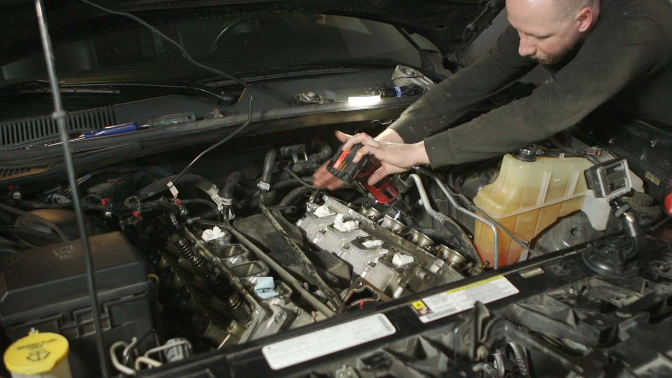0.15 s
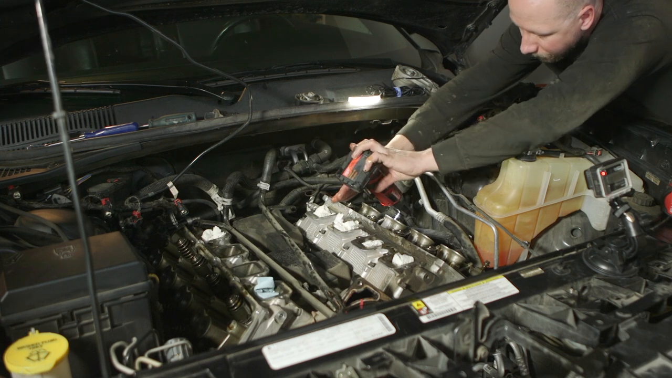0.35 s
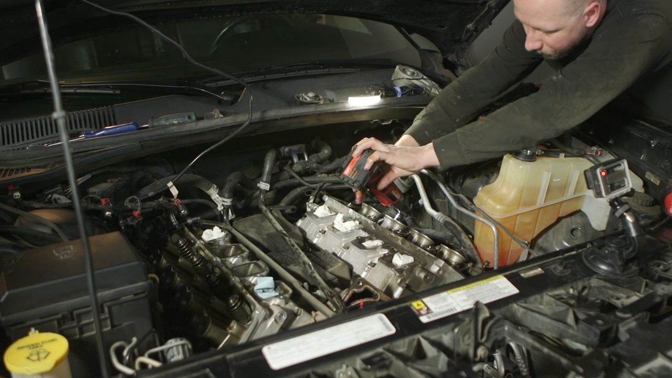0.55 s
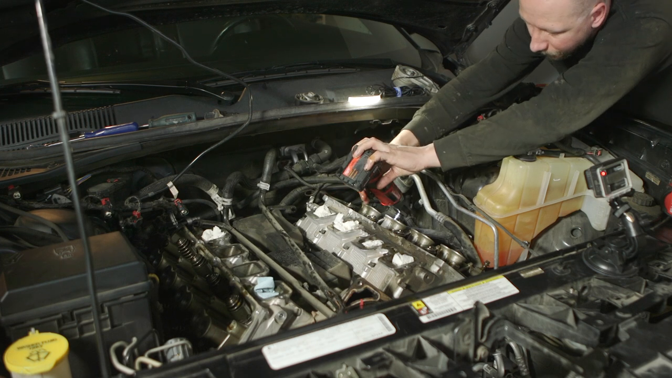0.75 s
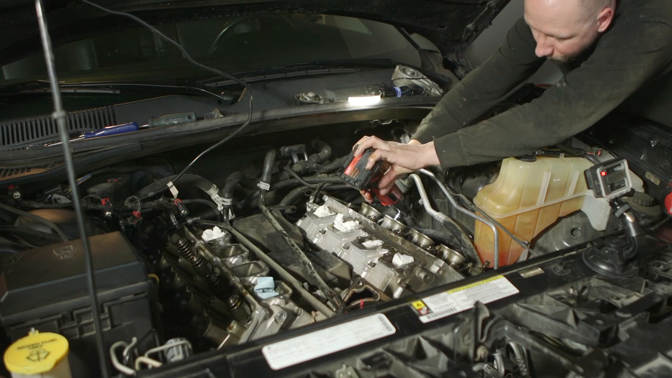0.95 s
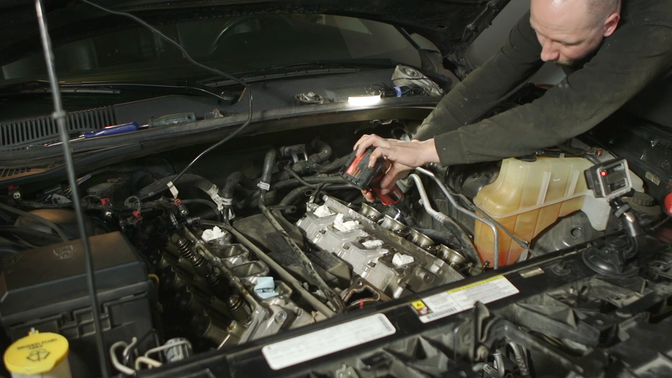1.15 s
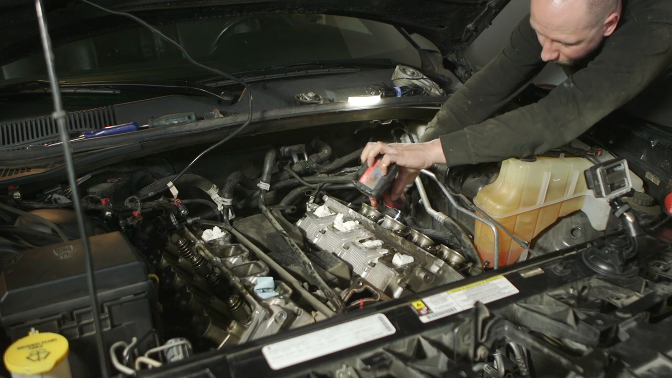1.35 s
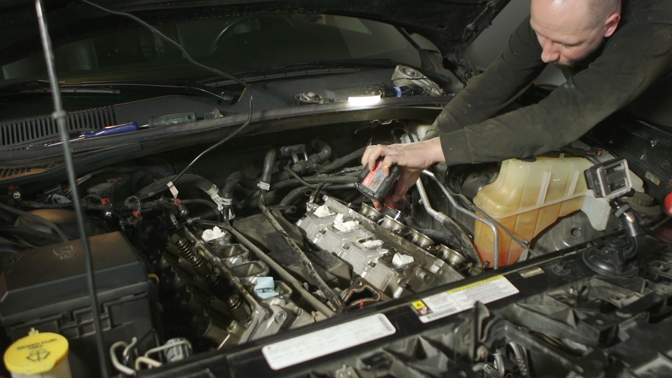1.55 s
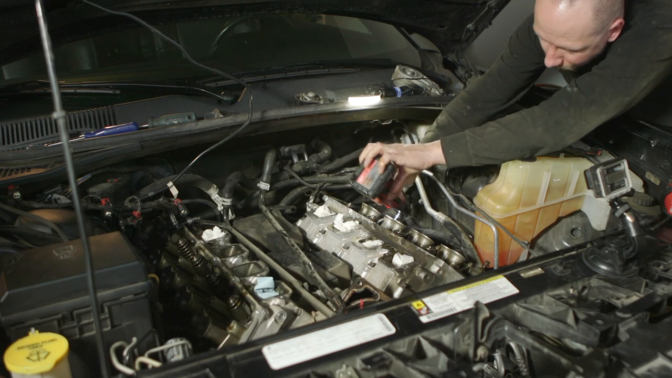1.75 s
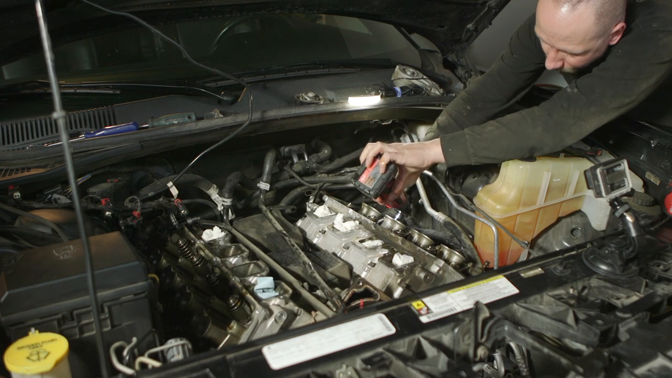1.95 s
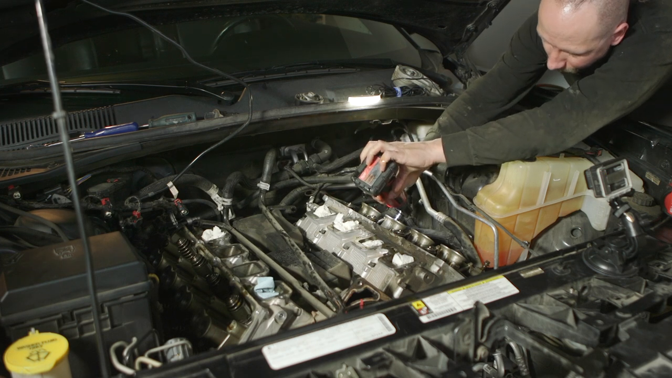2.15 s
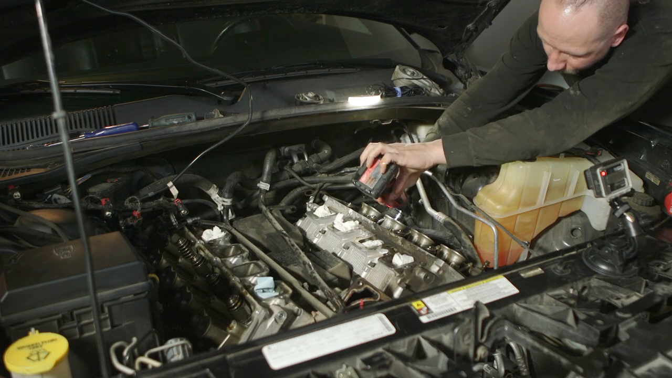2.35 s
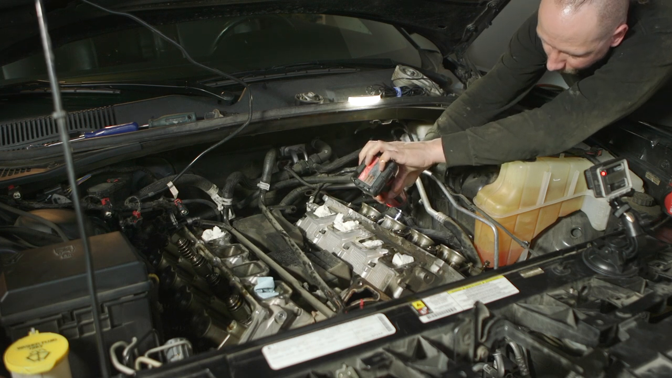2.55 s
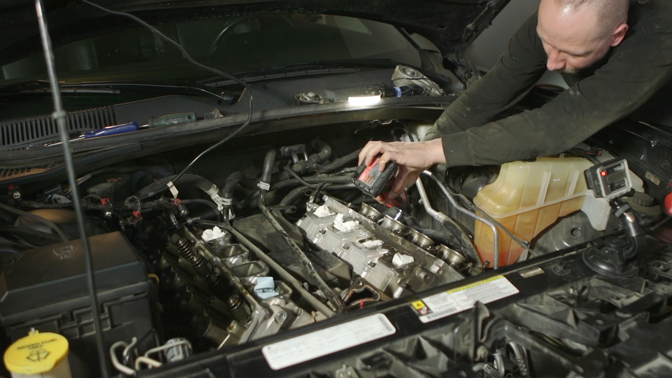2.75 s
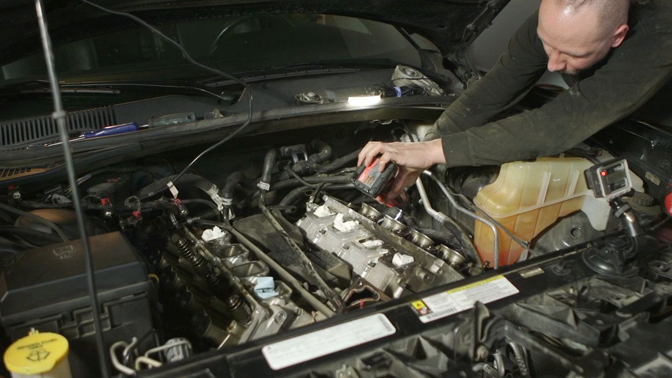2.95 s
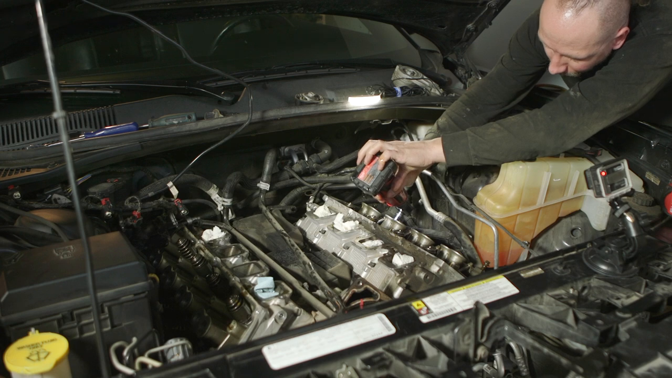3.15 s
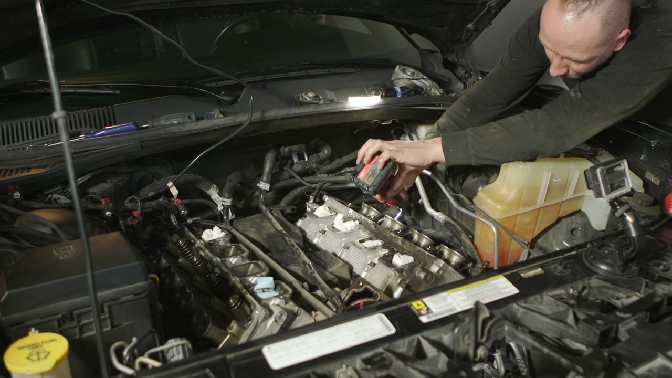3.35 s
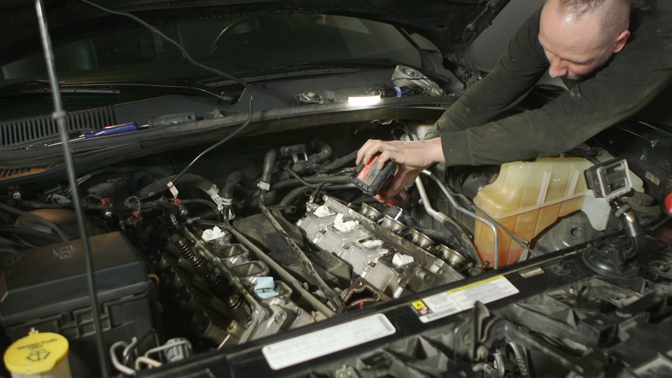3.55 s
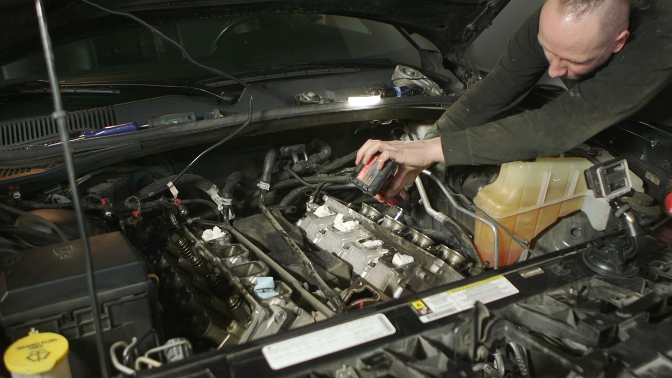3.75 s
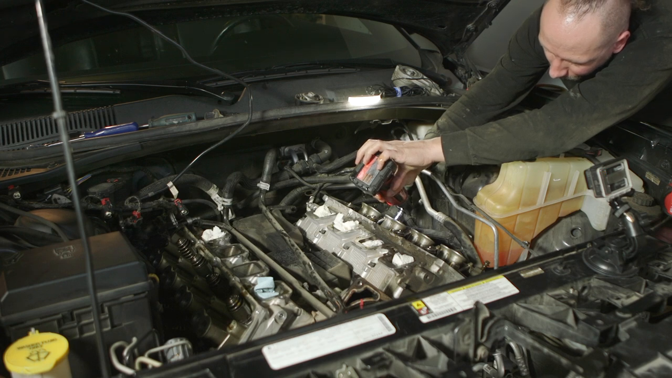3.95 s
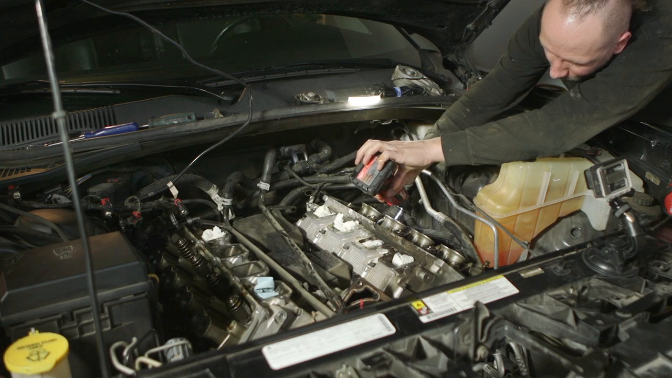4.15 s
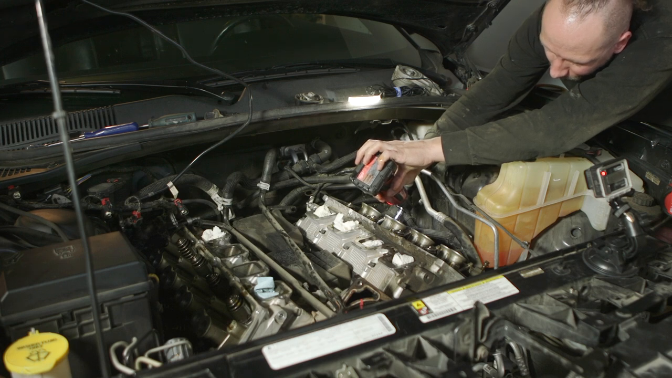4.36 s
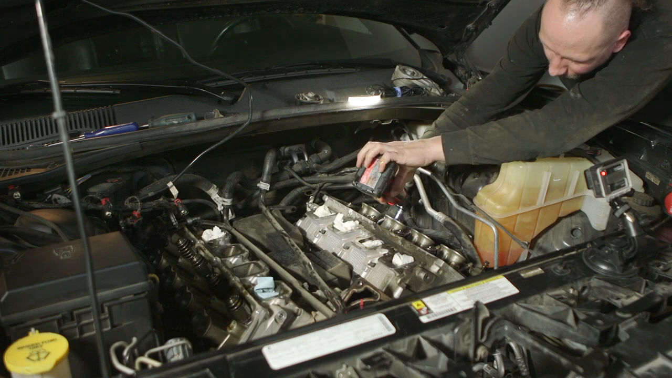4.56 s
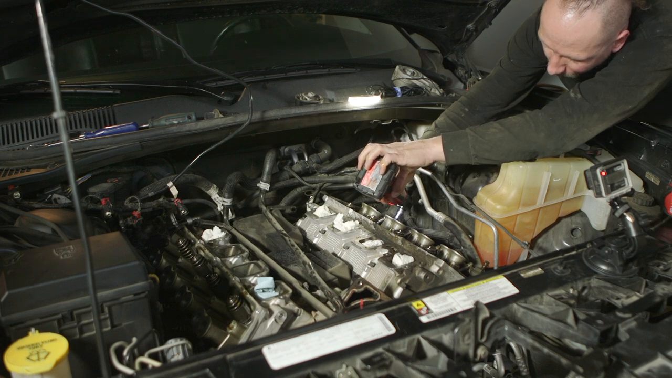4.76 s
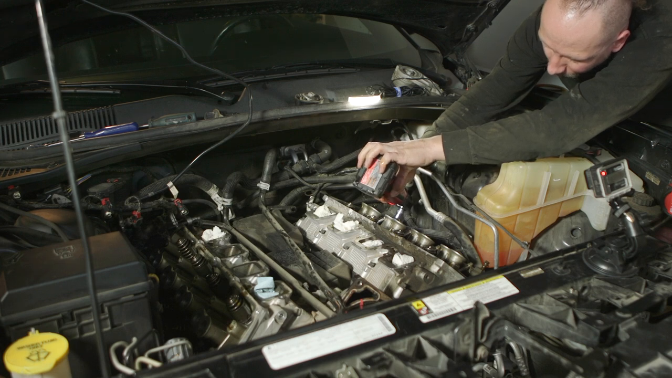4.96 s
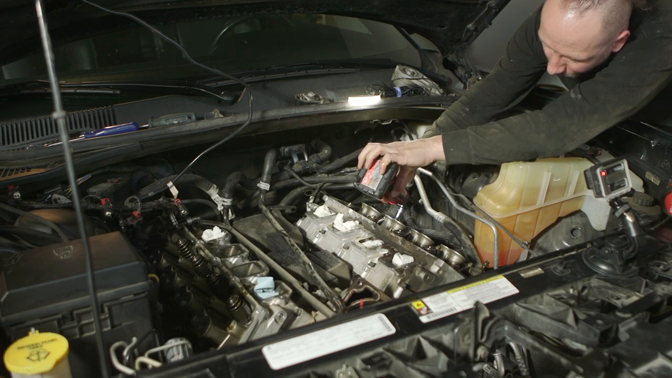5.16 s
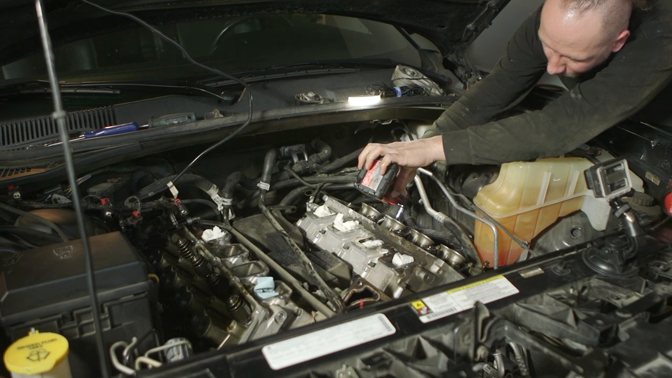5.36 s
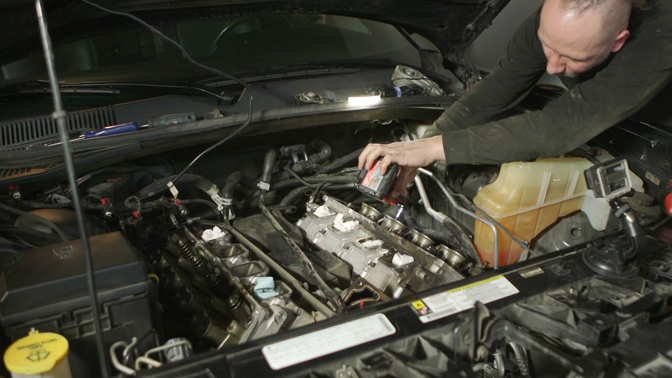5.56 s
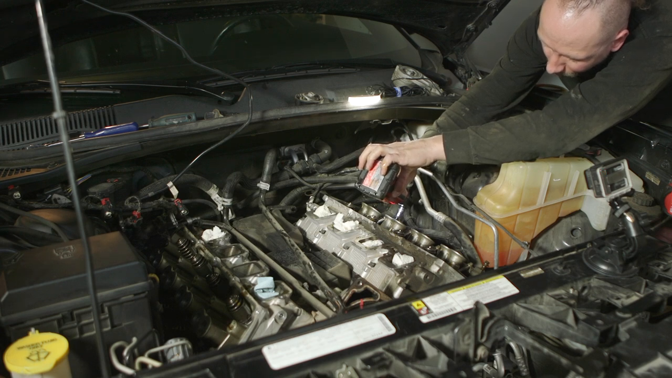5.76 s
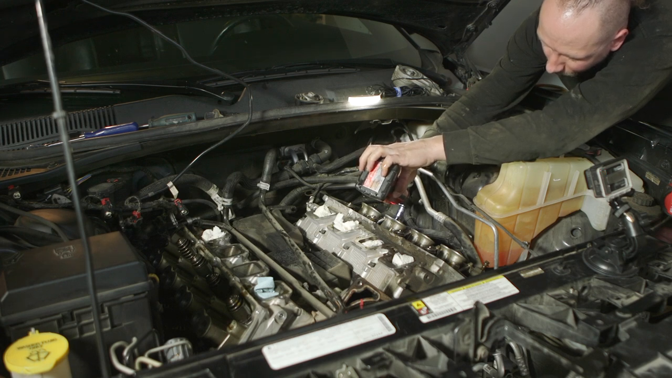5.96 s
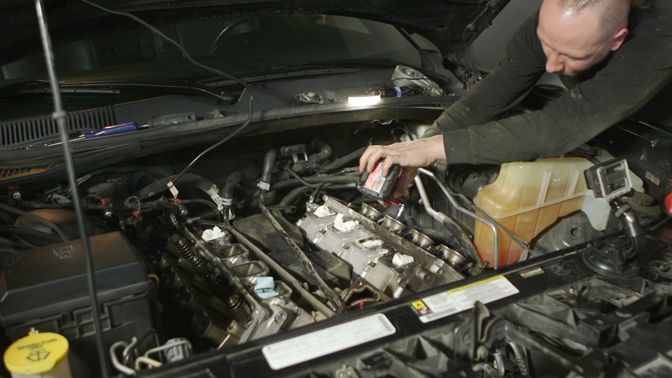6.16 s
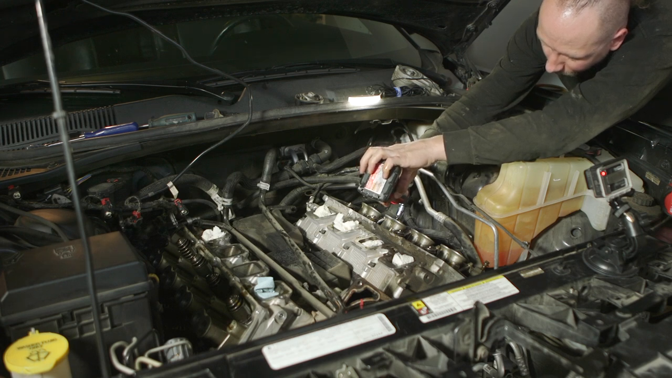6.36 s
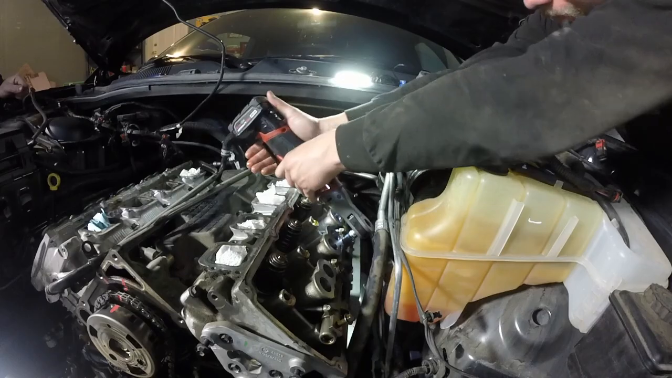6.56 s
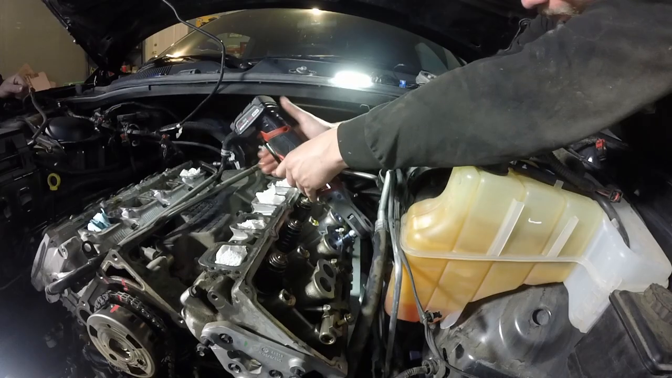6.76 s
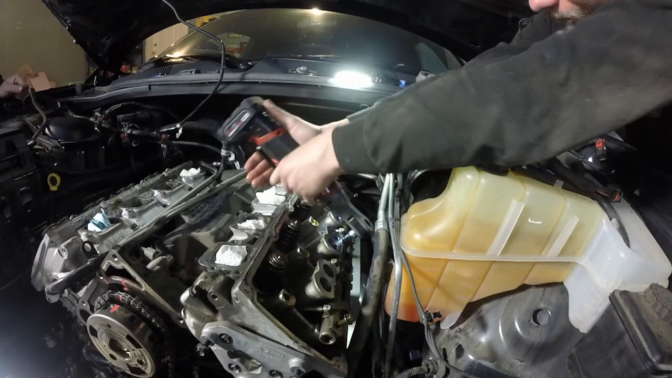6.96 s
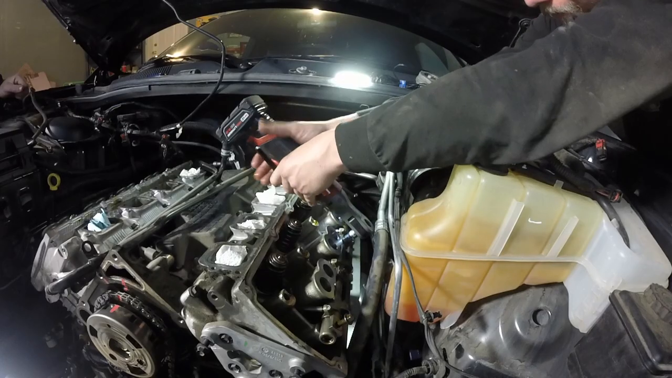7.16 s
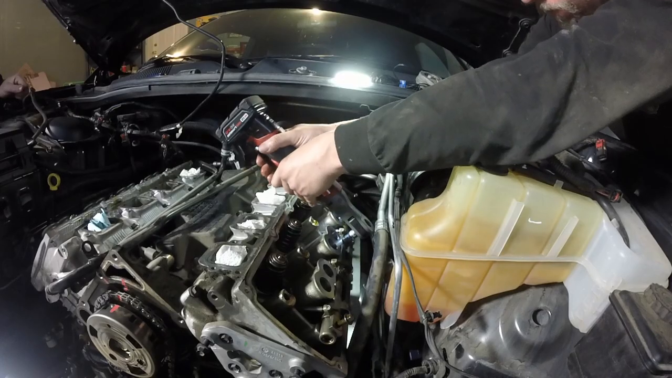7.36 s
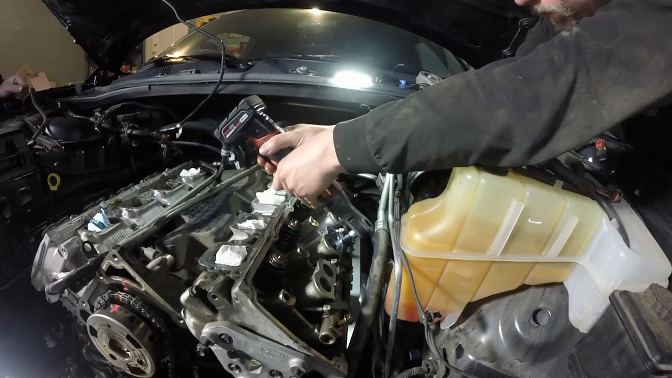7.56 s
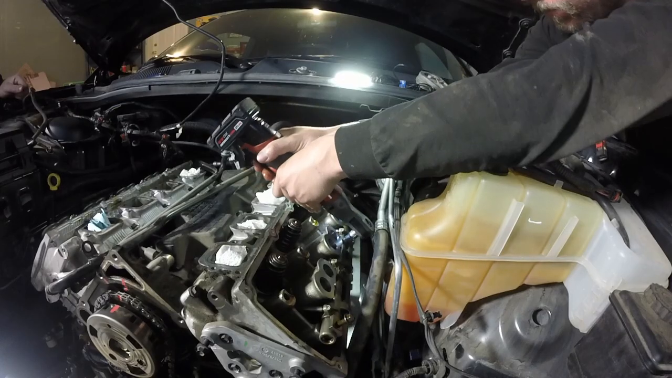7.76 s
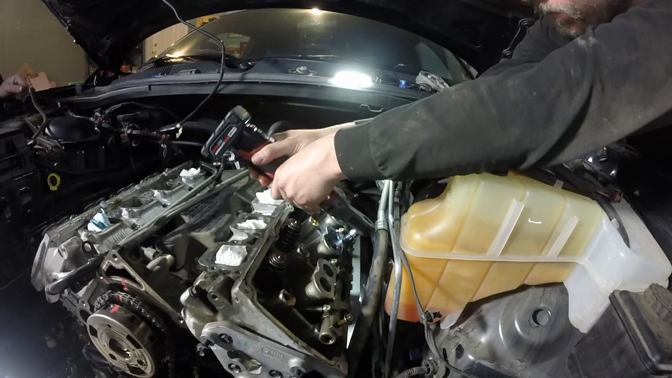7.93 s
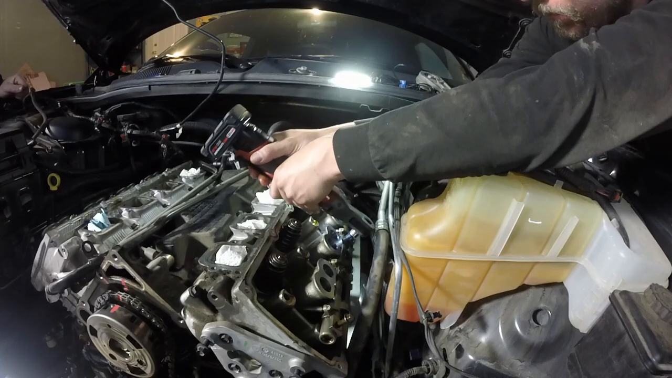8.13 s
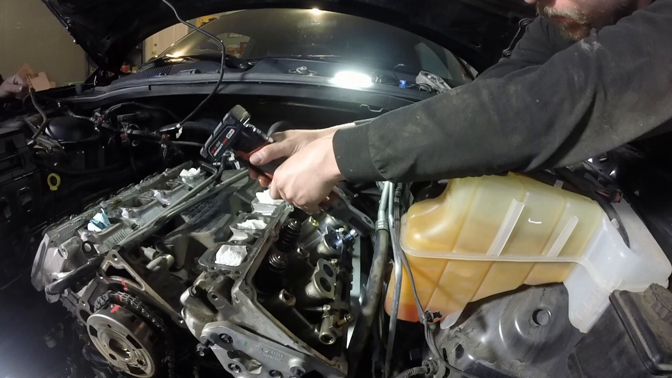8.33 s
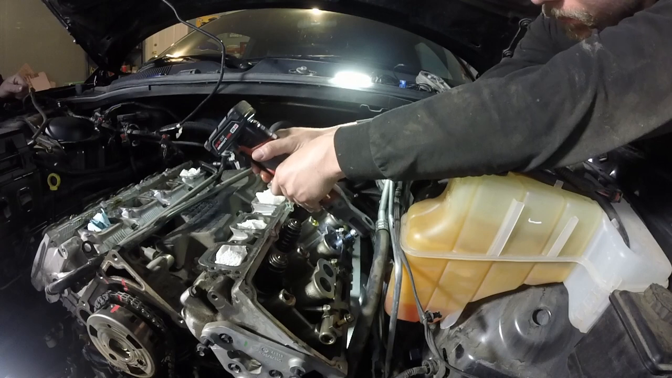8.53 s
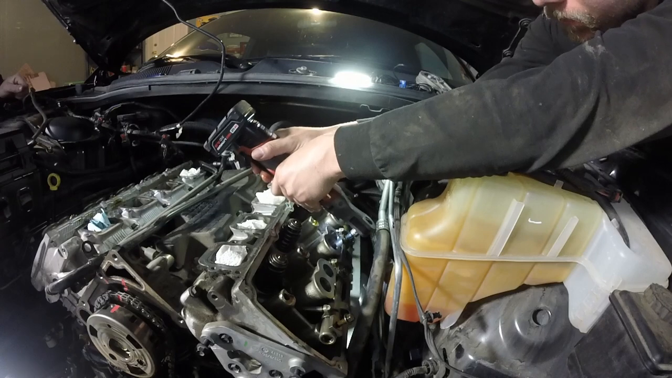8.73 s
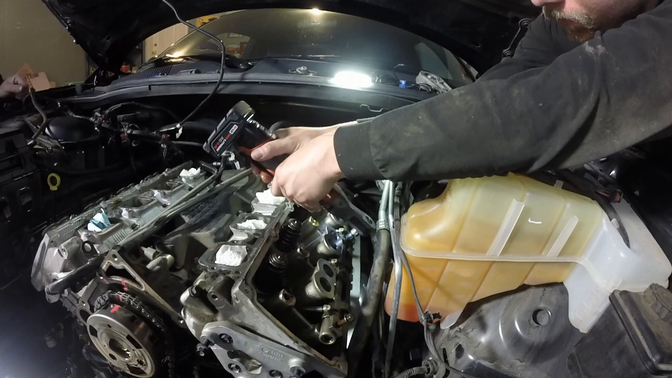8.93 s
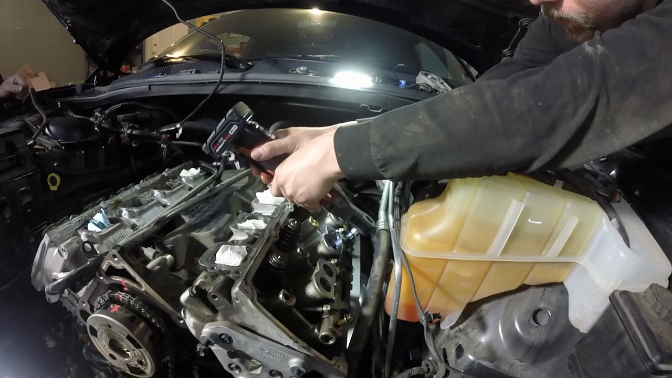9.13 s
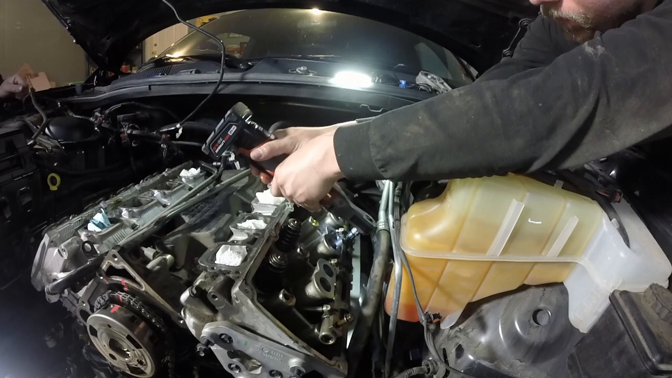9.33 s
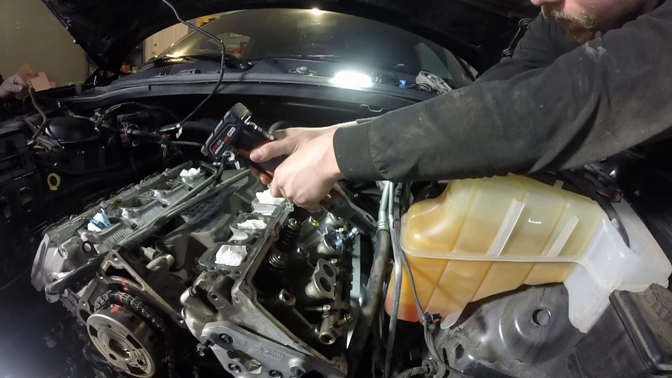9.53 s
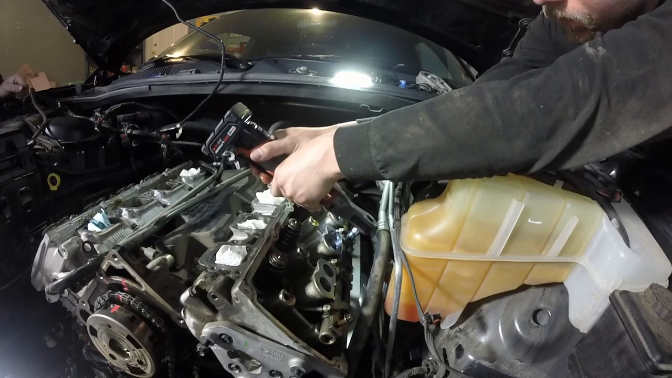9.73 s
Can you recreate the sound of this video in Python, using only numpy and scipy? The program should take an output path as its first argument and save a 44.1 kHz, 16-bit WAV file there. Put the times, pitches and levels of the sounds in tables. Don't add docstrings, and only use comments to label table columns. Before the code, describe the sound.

A quiet garage with soft low air noise, in stereo from about a step away. A faint clatter dies at the start; small metal clicks follow at 0.3 s, with faint ticks until 1.7 s. At 1.76 s a cordless ratchet spins up quickly into a bright electric whine over a fast, gritty gear rattle, with a thin high metallic ring. It runs steadily; around 4.2 s a lower hum swells, at 4.7 s it briefly bogs, then recovers. Released near 6.15 s, it coasts down and echoes. At 6.49 s the sound abruptly becomes close mono with louder background rumble. Hard metal knocks land at 6.5 and 6.96 s, with weak taps between and after. At 7.55 s the ratchet starts again, much louder and rougher, thudding as it builds speed, then buzzing with a heavier low hum from 8.7 s, still running at the end.

```python
import sys
import numpy as np
from scipy import signal
from scipy.fft import rfft, irfft, next_fast_len
from scipy.io import wavfile
from scipy.ndimage import uniform_filter1d

SR = 44100
rng = np.random.default_rng(int(sys.argv[2]) if len(sys.argv) > 2 else 0)


def decibels_to_gain(level_db):
    exponent = np.asarray(level_db, float) / 20
    return 10 ** exponent


def persist_wave(psi):
    counts = np.round(np.clip(psi, -1, 1) * 32767).astype(np.int16)
    wavfile.write(sys.argv[1], SR, np.atleast_2d(counts).T)


N = 436149
TIME = np.arange(N) / SR
GEAR_RATIO = 511.5 / 71.9
TURN_STROKES = 21.3


def level(x, db):
    return x * decibels_to_gain(db) / np.sqrt(np.mean(x ** 2))


def colour(x, points, peaks=()):
    size = next_fast_len(x.shape[-1])
    hz = np.maximum(np.arange(size // 2 + 1) * SR / size, 1)
    point_hz, point_db = np.transpose(points)
    db = np.interp(np.log(hz), np.log(point_hz), point_db)
    for centre, width, lift_db in peaks:
        db = db + lift_db / (1 + (2 * (hz - centre) / width) ** 2)
    return irfft(rfft(x, size) * decibels_to_gain(db), size)[..., :x.shape[-1]]


def walk(rate, size):
    hold = int(SR / rate)
    steps = np.repeat(rng.standard_normal(size // hold + 1), hold)
    return 1.306 * uniform_filter1d(uniform_filter1d(steps, hold), hold)[:size]


def floor(points, db, side_db):
    mid, side = colour(rng.standard_normal((2, N)), points) * decibels_to_gain(walk(3.3, N))
    side = colour(side, [(60, -14), (400, -3), (3000, 0.5)])
    stereo = mid + decibels_to_gain(side_db) * side * np.array([[1], [-1]])
    return colour(level(stereo, db), [(8000, 0.0), (12000, -3), (16000, -17.5)])


def room(x, t60, treble_t60, wet_db, side_db):
    t = np.arange(int(.7 * SR)) / SR
    noise = rng.standard_normal((3, len(t)))
    low = signal.sosfilt(signal.butter(2, 5000, fs=SR, output="sos"), noise)
    tails = low * decibels_to_gain(-60 * t / t60) + (noise - low) * decibels_to_gain(-60 * t / treble_t60)
    tails = tails * np.clip(t / 0.0031, 0, 1)
    mids = colour(tails[:2], [(200, -1.5), (3000, -0.37), (14000, -1)])
    side = colour(tails[2], [(200, -7), (1300, -7.0), (4400, 1.5), (14000, 2.5)])
    scale = decibels_to_gain(wet_db) / np.sqrt(np.sum(mids[0] ** 2))
    shift = 2 * np.pi * 3 * TIME + walk(4, N)
    patterns = x * np.array([np.cos(shift), np.sin(shift)])
    mid = signal.oaconvolve(patterns, scale * mids, axes=1)[:, :N].sum(axis=0)
    side = signal.oaconvolve(x, scale * side)[:N]
    return x + mid + decibels_to_gain(side_db) * side * np.array([[1], [-1]])


def fading_clatter():
    echo = colour(rng.standard_normal(N), [(500, -20), (1500, -4), (3000, -1), (5000, -10), (9000, -26)])
    return level(echo, -58) * (np.exp(-TIME / 0.043) + .08 * np.exp(-TIME / .5))


def taps(events, body, top_db):
    out = np.zeros(N + SR)
    t = np.arange(SR // 4) / SR - .005
    contact_s = .0022
    for s, db, hz, decay_s, tilt_db in events:
        shape = [(100, -3 * tilt_db - 6.5), (800, -2 * tilt_db), (3200, 7.5), (9000, 1.1 * tilt_db),
                 (15500, top_db), (16200, -70)]
        fade = np.exp(-t / decay_s) + .2 * np.exp(-t / (4 * decay_s))
        fade = fade * np.clip(.3 + t / contact_s, 0, 1) * (t >= 0)
        tick = 2.2 * (np.arange(len(t)) == np.argmax(fade))
        tap = colour(rng.standard_normal(len(t)) * fade + tick, shape, [(hz, 250, 7)] + body)
        tap = tap * np.clip(1 + t / .0006, 0, 1)
        start = int((s + t[0]) * SR)
        out[start:start + len(t)] += decibels_to_gain(db + 4) * tap / np.abs(tap).max()
    return out[:N]


def jolt(s, db, hz, length_s):
    return decibels_to_gain(db) * np.sin(2 * np.pi * hz * (TIME - s)) * np.exp(-((TIME - s) / length_s) ** 2)


def shaft_speed(t, pull, spin_up):
    _, catch_s, release_s, full_hz = pull
    bind_s, lost_hz, sink_s, recover_s = 4.69, 86, .072, .04
    crawl_hz, coast_hz_per_s = 230, 980
    sinking = np.clip(1 + (t - bind_s) / sink_s, 0, 1)
    bind = np.where(t < bind_s, sinking, np.exp(-np.abs(t - bind_s) / recover_s))
    lag = sum(lag_hz * np.exp((catch_s - t) / lag_s) for lag_hz, lag_s in spin_up)
    coast = coast_hz_per_s * np.maximum(t - release_s, 0)
    return np.maximum(full_hz - lag - lost_hz * bind - coast, crawl_hz), bind


def effort(t, pull, bind):
    age = np.maximum(t - pull[0], 0)
    after = np.maximum(t - pull[2] - .04, 0)
    start = -30 * np.clip(1 - age / .0087, 0, 1) - 29 * np.exp(-(age / .037) ** 1.5)
    return start + 6.5 * np.exp(-age / .077) - 2 * bind - 38 * (10 * after) ** 1.73


def motor_whine(t, hz, shaft, load_db, slow, motor, shade, whine_db, flutter_db, ring_db):
    size = len(t)
    lines = sum(decibels_to_gain(db + load_db - 18 * slow + walk(12, size)) * np.sin(k * shaft) for k, db in motor)
    slot_db = whine_db + ring_db * np.exp(-((8 * hz - 3720) / 170) ** 2)
    slot_db = slot_db - 1.2 * np.clip(452 - hz, 0, 25)
    shading = sum(db * ((t > a) & (t < b)) for a, b, db in shade)
    slot_db = slot_db + uniform_filter1d(shading, SR // 25) + np.minimum(load_db, 0)
    return lines + decibels_to_gain(slot_db + (flutter_db + 5.3 * slow) * walk(45, size)) * np.sin(8 * shaft)


def crank_hum(t, crank, load_db, slow, bearing, crank_db, rest_db, hum_share, wobble_s, wobble):
    size = len(t)
    running_db = np.minimum(load_db, 0)
    s, push_db, grip_db = np.transpose(bearing)
    first_db = np.interp(t, s, push_db) + running_db
    second_db = np.interp(t, s, grip_db)
    press_db = np.clip(second_db - np.median(second_db), -12, 14)
    hum_db = rest_db + hum_share * press_db + running_db + 1.9 * walk(10, size)
    slack = np.sin((crank - np.interp(wobble_s, t, crank)) / (2 * TURN_STROKES))
    slack_db = 10 * np.log10(1 - min(wobble, .99) * (1 - slack ** 2) ** 4)
    second_db = second_db + running_db + slack_db + 1.6 * walk(14, size)
    hum = decibels_to_gain(first_db) * np.sin(crank) + decibels_to_gain(second_db) * np.sin(2 * crank + 0.11 * walk(25, size))
    for k, db in enumerate(crank_db, 3):
        sway_db = (1.2 + 0.2 * k) * walk(13, size)
        drift = 0.083 * k * walk(25, size)
        base_db = hum_db if k < 6 else rest_db + load_db - 6.8 * slow
        hum = hum + decibels_to_gain(db + sway_db + base_db) * np.sin(k * crank + drift + k * k)
    rumble = colour(rng.standard_normal(size), [(40, -14), (200, -6.0), (350, -4.5), (600, -2.5), (2000, -60)])
    return hum + decibels_to_gain(hum_db + 0.54 * np.maximum(hum_db - rest_db, 0)) * level(rumble, -11.5)


def gear_rattle(blow, slam, slow, rattle, housing, gate, start_slam, grit_db):
    teeth = rng.standard_normal(len(blow)) * decibels_to_gain(grit_db * walk(900, len(blow)))
    gating = (1 + gate * slam + 1.6 * start_slam * slow * blow ** 2) / (1 + .14 * start_slam * slow)
    return level(colour(teeth * gating, rattle, housing), 0)


def pawl_thud(blow, thud_db):
    push = .5 * rng.standard_normal(len(blow)) * blow + 3 * blow ** 8
    return level(colour(push, [(300, -29), (850, -9), (3000, -40)], [(842, 150, 13.0)]), thud_db)


def pawl_squeal(t, crank, slam, squeal_db):
    size = len(t)
    angle = (crank - np.interp(2.92, t, crank)) / TURN_STROKES
    socket = .5 + .5 * np.cos(angle + .12 * walk(5, size))
    ring = colour(rng.standard_normal(size) * (0.14 + slam),
                  [(6000, -46.5), (9000, -11), (15500, -29.5), (16200, -60)],
                  [(10270, 250, 4), (10380, 1350, 14), (13800, 400, 11)])
    return level(ring * (0.22 + socket ** 1.4) * decibels_to_gain(1.8 * walk(40, size)), squeal_db)


def chopper(t, pwm_db):
    age = t - t[0] - .003
    return decibels_to_gain(pwm_db) * np.sin(2 * np.pi * (9700 + 9000 * age) * age) * np.exp(-((age - .023) / .016) ** 6)


def ratchet(pull, spin_up, bearing, shade, steady_db, whine_db, flutter_db, ring_db, rest_db, hum_share,
            wobble_s, wobble, rattle, housing, motor, crank_db, slam_s, start_slam, thud_db, squeal_db, pwm_db):
    on = (TIME >= pull[0] - .011) & (TIME <= pull[2] + .135)
    t = TIME[on]
    hz, bind = shaft_speed(t, pull, spin_up)
    load_db = effort(t, pull, bind)
    shaft = 2 * np.pi * np.cumsum(hz * (1 + 0.00104 * walk(30, len(t)))) / SR
    crank = (shaft - np.interp(slam_s, t, shaft)) / GEAR_RATIO
    slow = np.clip(1 - hz / hz.max(), 0, .15) / 0.23
    lines = motor_whine(t, hz, shaft, load_db, slow, motor, shade, whine_db, flutter_db, ring_db)
    lines = lines + crank_hum(t, crank, load_db, slow, bearing, crank_db, rest_db, hum_share, wobble_s, wobble)
    turn = crank / (2 * np.pi) % 1
    blow = np.exp(-turn / .15)
    slam = blow + .5 * np.exp(-((turn + .5) % 1) / .15)
    gears = gear_rattle(blow, slam, slow, rattle, housing, gate=.44, start_slam=start_slam, grit_db=1.5)
    thud = decibels_to_gain(np.minimum(load_db, 0)) * slow ** 1.2 * pawl_thud(blow, thud_db)
    driven = gears + pawl_squeal(t, crank, slam, squeal_db) + thud
    free = np.exp(-(np.maximum(t - pull[0], 0) / .034) ** 4)
    pinion = colour(gears, [(500, -7), (1500, 0.5), (4300, 6), (6500, -3), (9000, -6), (14000, -14)])
    out = np.zeros((2, N))
    out[0, on] = np.sqrt(2) * lines + chopper(t, pwm_db)
    out[1, on] = decibels_to_gain(steady_db + load_db) * (free * pinion + (1 - free) * driven)
    return out


def far_view():
    # frequency in Hz, level in dB per Hz of the garage air.
    air = [(12, -54), (20, -28), (32, -21), (49, -10), (68, -8.5), (127, -10.5), (158, -10.5), (187, -16.5),
           (241, -14.5), (16000, -49.5)]
    # start in seconds, peak in dB, ring in Hz, decay in seconds, tilt in dB an octave.
    clicks = [
        (0.3185, -48, 4370, 0.005, -3),
        (0.3255, -38, 3900, 0.0045, -3),
        (0.358, -51, 5600, 0.006, -4),
        (0.44, -66, 3800, 0.05, -1),
        (0.53, -66, 5500, 0.025, 1),
        (0.7082, -59, 2100, 0.005, -1),
        (0.9935, -57, 3520, 0.005, 8),
        (1.3374, -70, 1100, 0.005, -1),
        (1.535, -53, 1000, 0.0043, -9),
        (1.724, -51, 2690, 0.005, -4),
    ]
    # frequency in Hz, level in dB per Hz.
    gear_tone = [(150, -45), (300, -32), (450, -16), (700, -12.5), (1100, -9.5), (2300, -6), (4400, -3.5),
                 (6500, -3.5), (7800, -9.5), (9500, -7), (12000, -12), (15000, -20), (15800, -26),
                 (16300, -70)]
    # centre in Hz, width in Hz, lift in dB.
    shell = [(1514, 230, 4.5), (2940, 130, 3), (3520, 140, 1.5), (4270, 1000, 4), (5590, 210, 4.5),
             (6650, 490, 2.5)]
    # multiple of the shaft speed, level in dB.
    orders = [(1, -44), (2, -48), (4, -50)]
    harmonics = [-12.5, -17, -4.5, -1.5, -2, -8.5, -3, -2, -8, -10.5]
    # missing speed in Hz, time constant in seconds.
    lags = [(250, .03), (60, .16)]
    # time in seconds, push (first harmonic) in dB, grip (second) in dB.
    lean = [
        (1.9, -74, -63.5),
        (2.7, -79, -68),
        (3.98, -79, -68),
        (4.16, -57, -35.5),
        (4.3, -54, -49),
        (4.55, -48, -47),
        (4.62, -49.5, -54.5),
        (4.72, -62.5, -70.5),
        (5.0, -80.5, -67),
    ]
    # from seconds, to seconds, change in dB.
    vents = [
        (1.798, 1.828, -9),
        (1.855, 1.87, -8),
        (1.89, 1.93, 4),
        (1.925, 2.063, 10.5),
        (2.06, 2.12, 6),
        (2.125, 2.352, 11.5),
        (4.6, 4.65, 1),
        (4.72, 4.74, -4),
        (4.74, 4.8, 9),
    ]
    lines, gears = ratchet(
        (1.761, 1.755, 6.165, 511.8), lags, lean, vents, steady_db=-24.5, whine_db=-44, flutter_db=2.0,
        ring_db=18, rest_db=-54.5, hum_share=0.68, wobble_s=4.285, wobble=.6, rattle=gear_tone,
        housing=shell, motor=orders, crank_db=harmonics, slam_s=1.842, start_slam=.8, thud_db=-15,
        squeal_db=-11, pwm_db=-49)
    struck = decibels_to_gain(-2.5) * (gears + taps(clicks, [], top_db=-24) + fading_clatter())
    view = room(struck + 0.23 * lines, t60=0.43, treble_t60=0.29, wet_db=-5.0, side_db=-0.5) + 0.76 * lines
    return view + floor(air, -66.5, side_db=-2.5)


def near_view():
    # frequency in Hz, level in dB per Hz of the garage air.
    air = [(12, -31), (20, 4.5), (150, -8.5), (193, -11), (485, -18.5), (660, -19.5), (923, -21),
           (6720, -36.5), (14300, -47.5), (16000, -68)]
    # start in seconds, peak in dB, ring in Hz, decay in seconds, tilt in dB an octave.
    knocks = [
        (6.4998, -19, 3340, 0.0093, -5.5),
        (6.7644, -54, 1170, 0.009, -2),
        (6.964, -22, 3340, 0.0091, -5.5),
        (7.3607, -55.5, 1000, 0.009, -7),
        (7.5078, -45, 2940, 0.0082, -8.5),
    ]
    # centre in Hz, width in Hz, lift in dB.
    casting = [(795, 110, 7.5), (1550, 210, -5), (2190, 200, -4), (4240, 360, 4)]
    # centre in seconds, level in dB, pitch in Hz, length in seconds.
    jolts = [
        (6.512, -40, 205, .011),
        (6.978, -41.5, 188, .011),
        (7.66, -37, 38, .055),
    ]
    # frequency in Hz, level in dB per Hz.
    gear_tone = [(120, -23), (250, -20), (450, -16), (700, -12), (1000, -6), (1700, -9), (2600, -8),
                 (4400, -7), (6500, -7.5), (7500, -16.5), (9000, -15), (12500, -26.5), (15000, -35),
                 (15600, -70)]
    # centre in Hz, width in Hz, lift in dB.
    shell = [(814, 57, 9.2), (1216, 70, 4.3), (1390, 71, 6.1), (3340, 53, 2), (4163, 62, 5.3),
             (5370, 100, 1.6), (6870, 310, 3.8), (8400, 240, 7.1), (9120, 200, 5.2), (10300, 100, 1.6)]
    # multiple of the shaft speed, level in dB.
    orders = [(1, -38), (2, -30), (4, -37), (16, -45)]
    harmonics = [-8.5, -10.5, -4.5, -11.5, -1.5, -6, -26, -23, -11.5, -8.5]
    # missing speed in Hz, time constant in seconds.
    lags = [(110, .028), (128, .1)]
    # time in seconds, push (first harmonic) in dB, grip (second) in dB.
    lean = [
        (7.6, -55, -46),
        (7.88, -66, -44.5),
        (8.44, -64, -37),
        (8.7, -48, -34),
        (9.1, -47, -32.5),
        (9.24, -45, -29),
        (9.6, -44, -29.5),
        (9.75, -41, -34.5),
        (9.89, -44, -29),
    ]
    # from seconds, to seconds, change in dB.
    vents = [
        (7.54, 7.765, -11),
        (7.78, 7.84, 3),
        (7.885, 7.953, -11),
        (8.21, 8.287, -6),
        (8.4, 8.46, -3),
        (8.553, 8.75, 2.5),
        (9.06, 9.1, -6),
        (9.32, 9.426, -10),
        (9.63, 9.703, -10),
    ]
    lines, gears = ratchet(
        (7.549, 7.59, 10.5, 511.6), lags, lean, vents, steady_db=-16.0, whine_db=-24, flutter_db=1.25,
        ring_db=6.0, rest_db=-34, hum_share=0.77, wobble_s=8.59, wobble=1.0, rattle=gear_tone,
        housing=shell, motor=orders, crank_db=harmonics, slam_s=7.662, start_slam=1.3, thud_db=-4.5,
        squeal_db=-25.0, pwm_db=-60)
    struck = decibels_to_gain(-1.5) * (gears + taps(knocks, casting, top_db=-32))
    view = room(struck + 0.14 * lines, t60=0.35, treble_t60=0.36, wet_db=-5.5, side_db=0) + 0.82 * lines
    mono = (view + floor(air, -51.5, side_db=-3)).mean(axis=0)
    mono = colour(mono, [(22, -8), (45, 0), (15100, 0), (15600, -40)])
    return mono + sum(jolt(*row) for row in jolts)


def scene():
    cut = np.clip((TIME - 6.489) / .008, 0, 1)
    balance = decibels_to_gain(np.array([[.25], [-.25]]))
    return (1 - cut) * far_view() * balance + cut * near_view()


def band_limit(x):
    return signal.sosfilt(signal.butter(12, 16400, fs=SR, output="sos"), x)


def record(dry):
    soft = np.tanh(0.93 * dry) / 0.87
    mix = signal.sosfilt(signal.ellip(8, .2, 70, 15750, fs=SR, output="sos"), soft)
    return band_limit(mix)


dry = scene()
out = record(dry)
persist_wave(out)
```